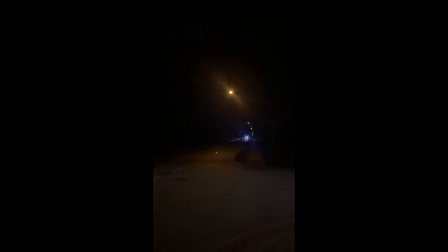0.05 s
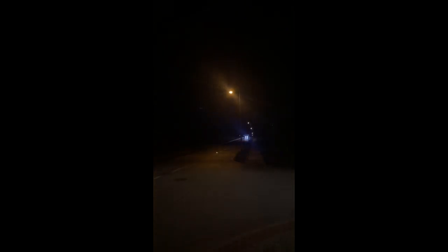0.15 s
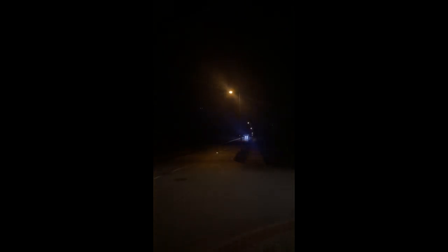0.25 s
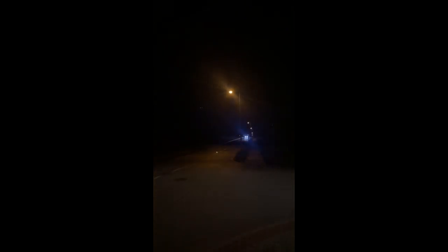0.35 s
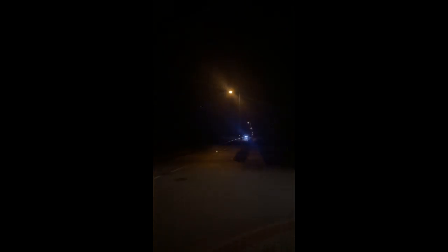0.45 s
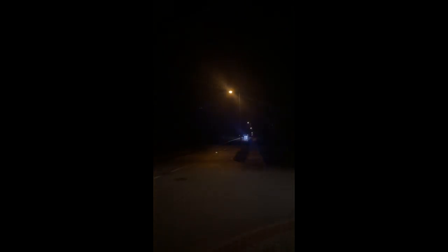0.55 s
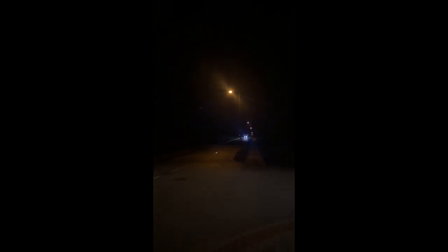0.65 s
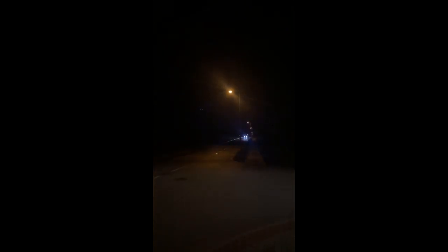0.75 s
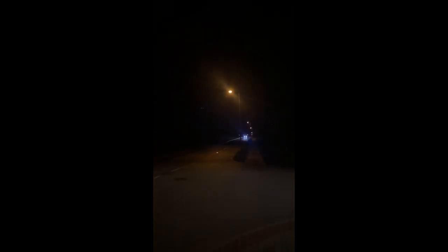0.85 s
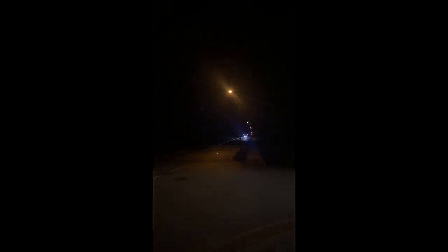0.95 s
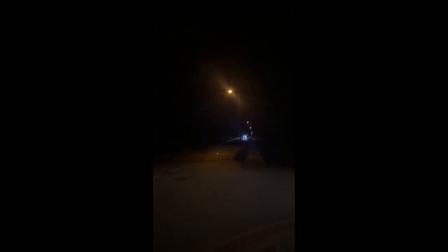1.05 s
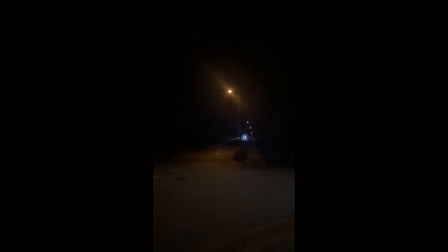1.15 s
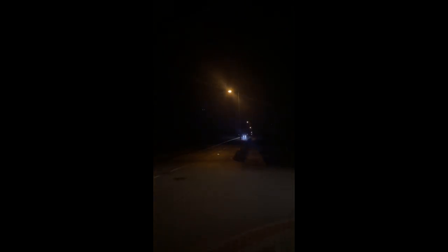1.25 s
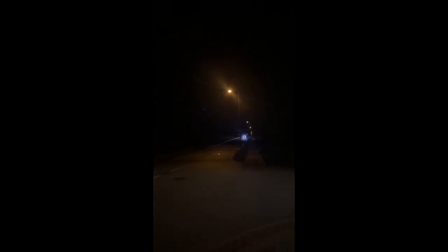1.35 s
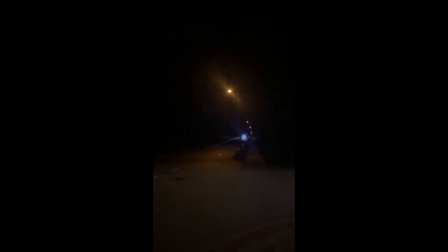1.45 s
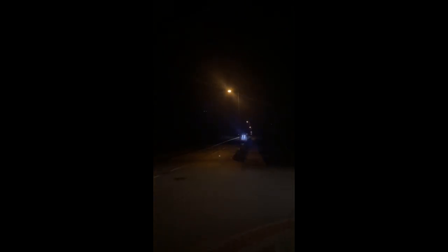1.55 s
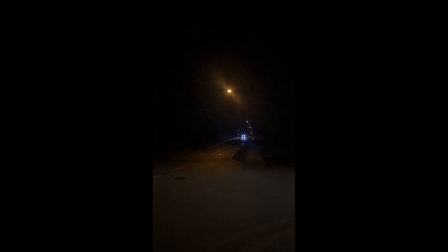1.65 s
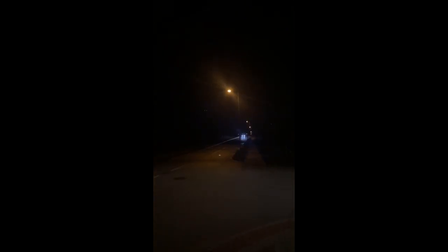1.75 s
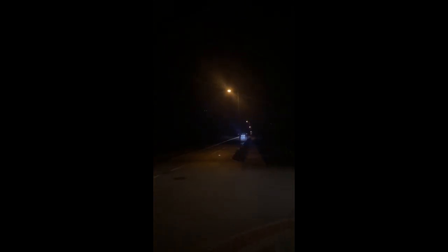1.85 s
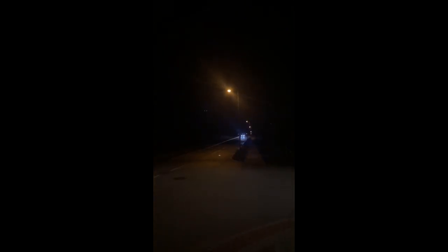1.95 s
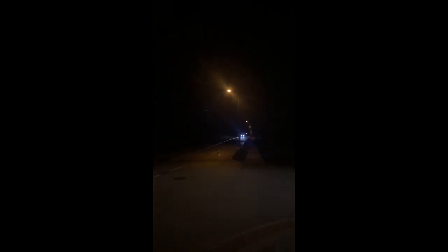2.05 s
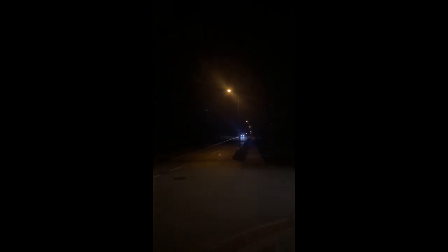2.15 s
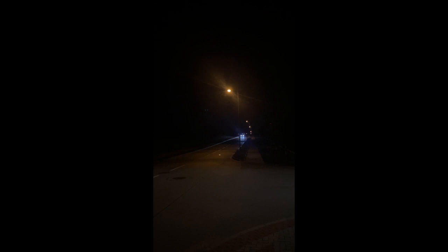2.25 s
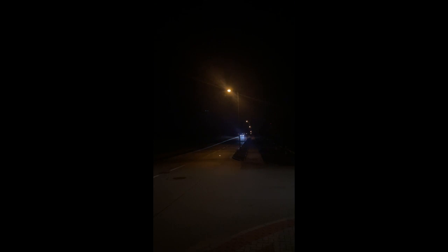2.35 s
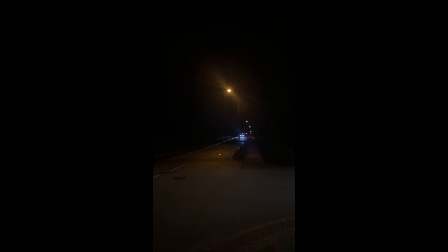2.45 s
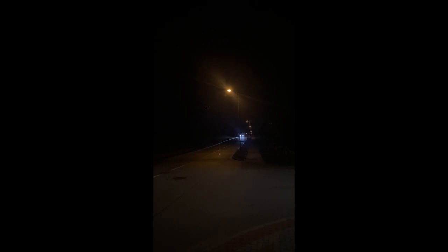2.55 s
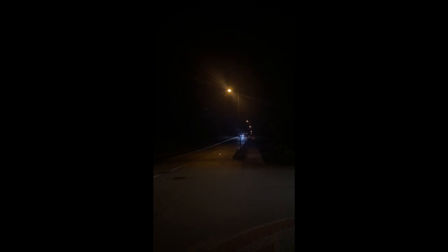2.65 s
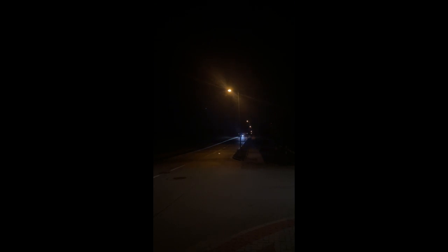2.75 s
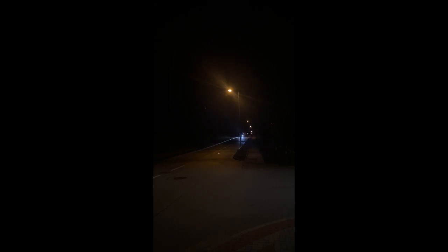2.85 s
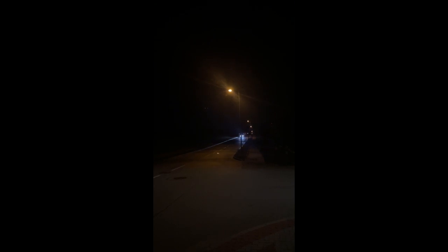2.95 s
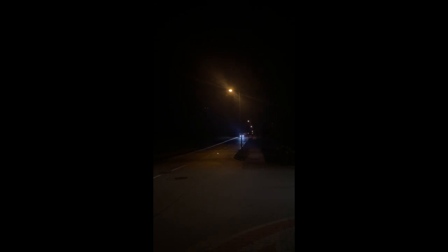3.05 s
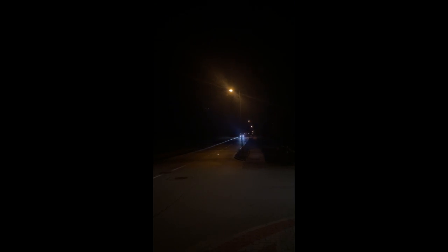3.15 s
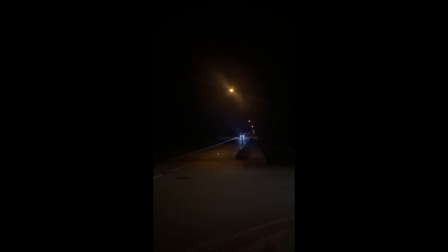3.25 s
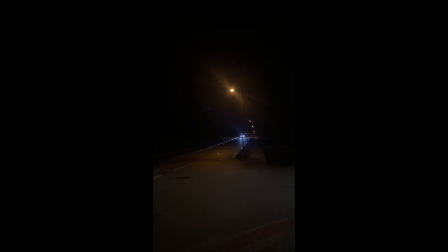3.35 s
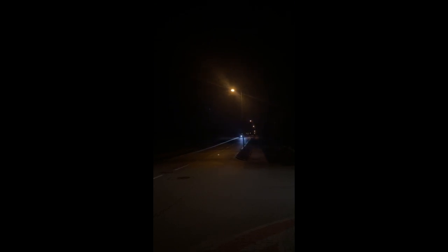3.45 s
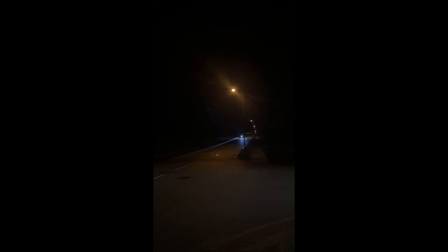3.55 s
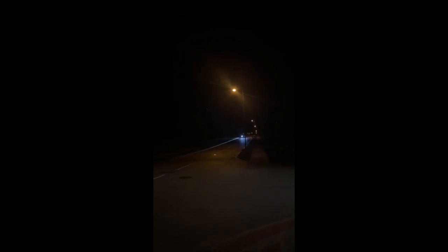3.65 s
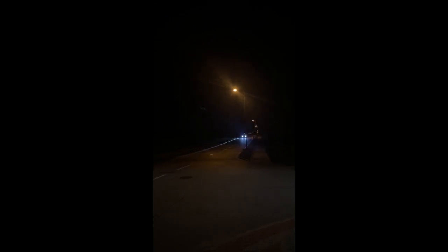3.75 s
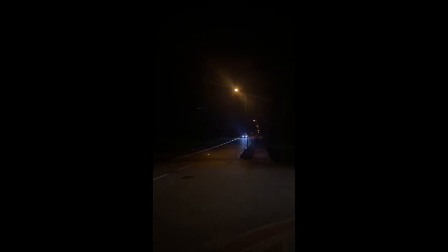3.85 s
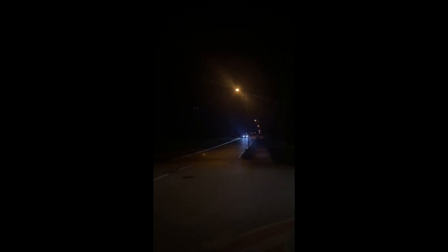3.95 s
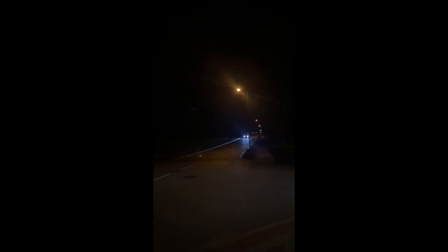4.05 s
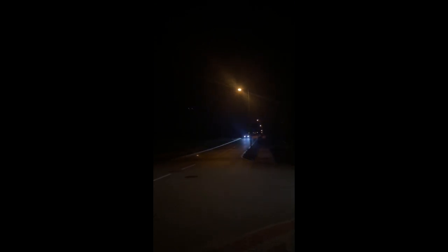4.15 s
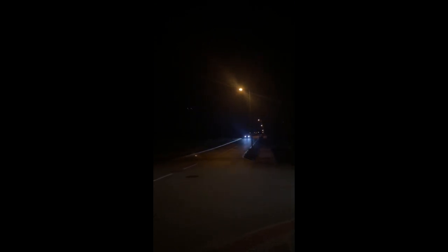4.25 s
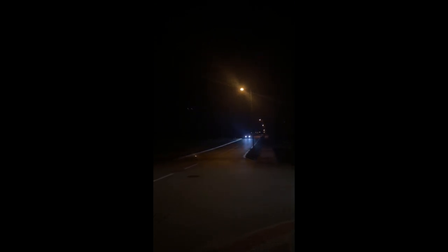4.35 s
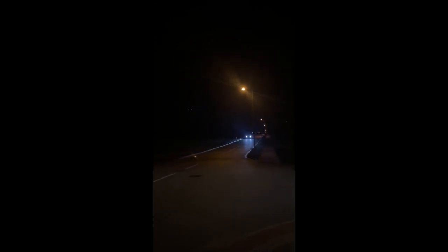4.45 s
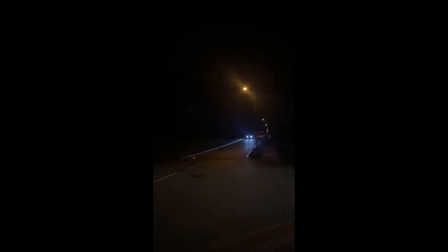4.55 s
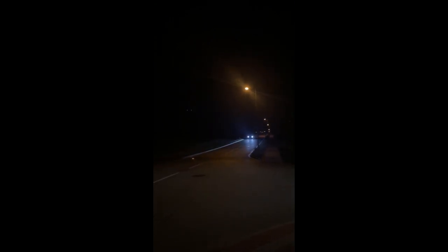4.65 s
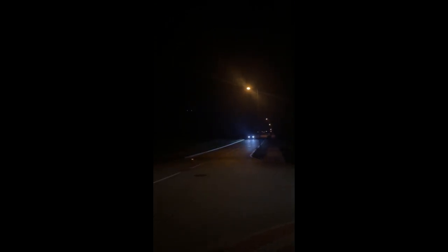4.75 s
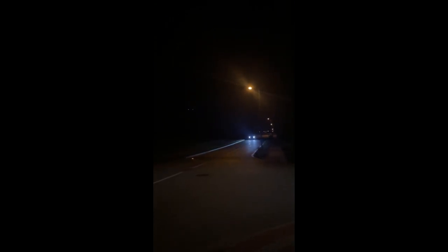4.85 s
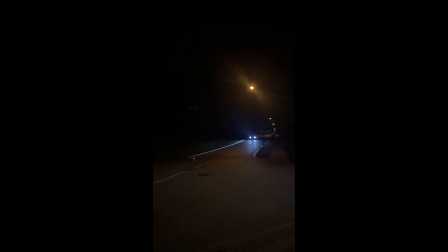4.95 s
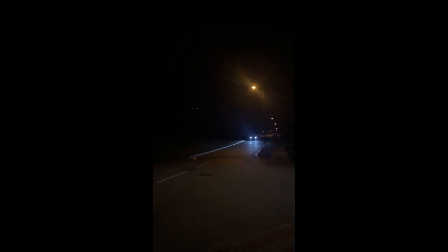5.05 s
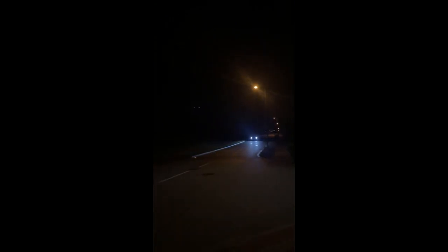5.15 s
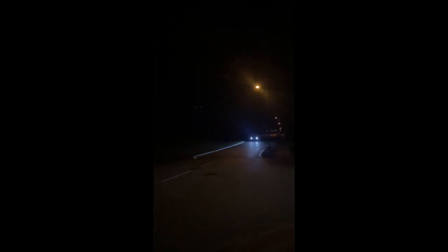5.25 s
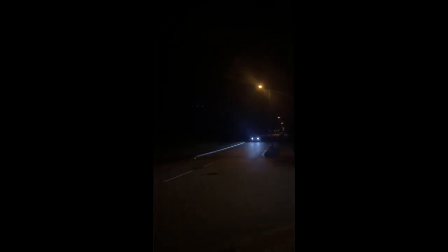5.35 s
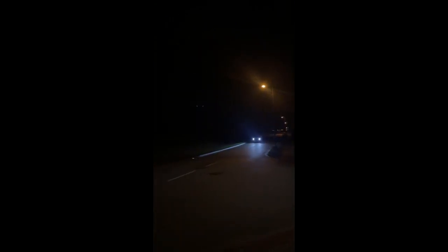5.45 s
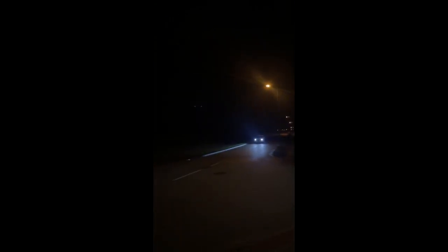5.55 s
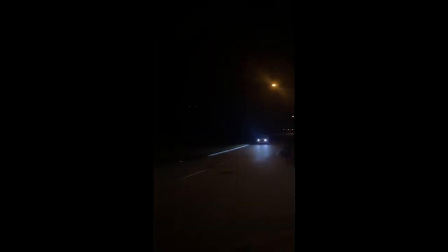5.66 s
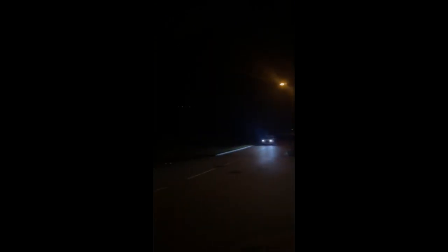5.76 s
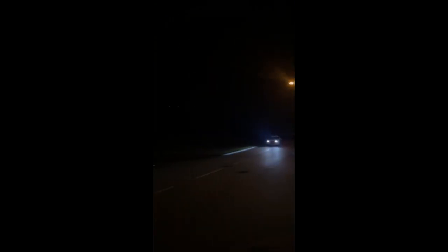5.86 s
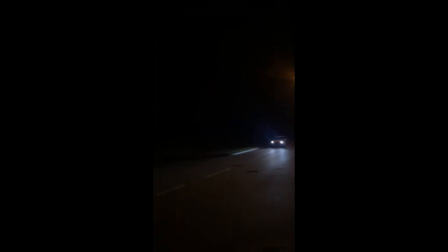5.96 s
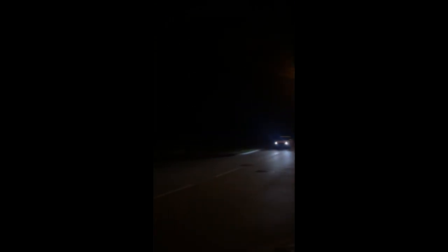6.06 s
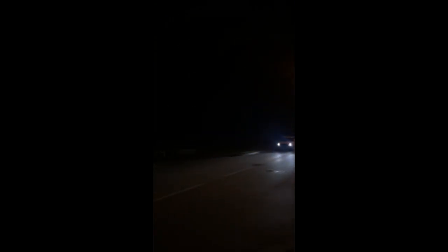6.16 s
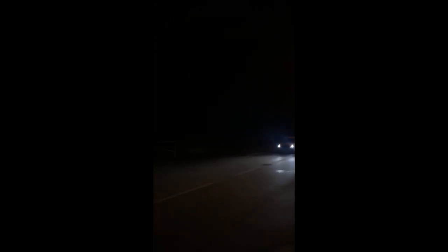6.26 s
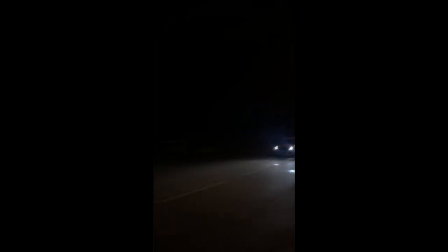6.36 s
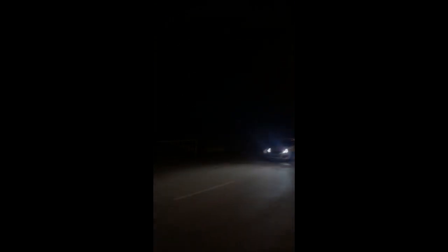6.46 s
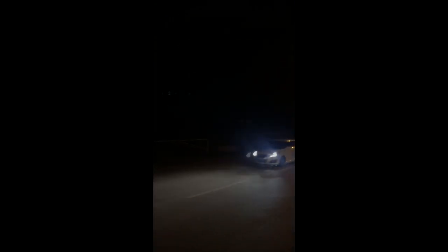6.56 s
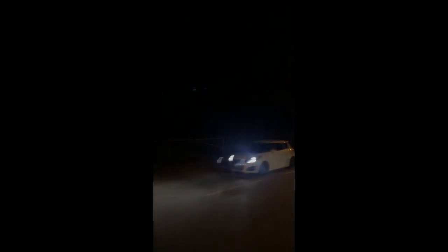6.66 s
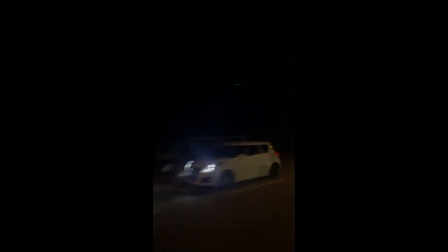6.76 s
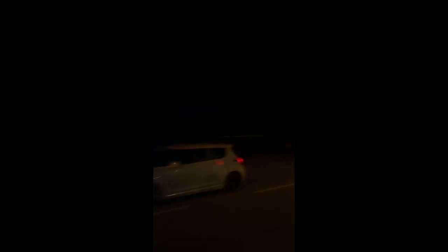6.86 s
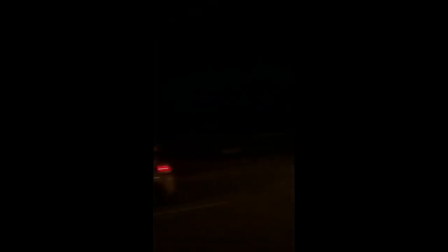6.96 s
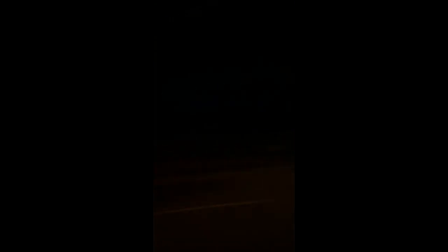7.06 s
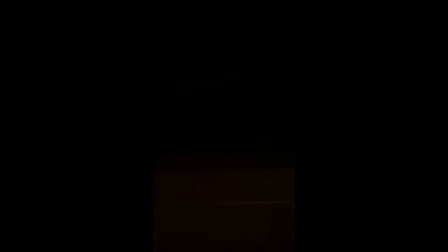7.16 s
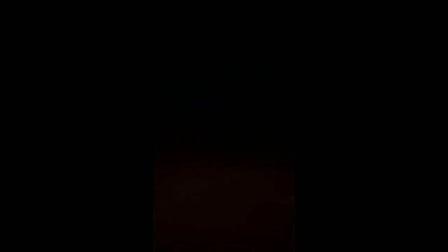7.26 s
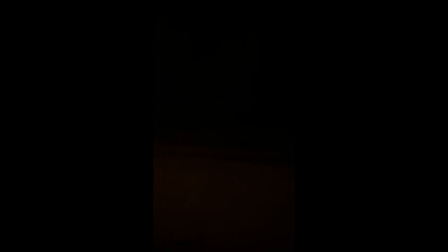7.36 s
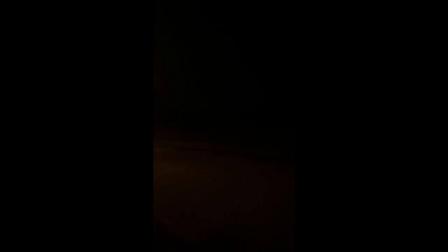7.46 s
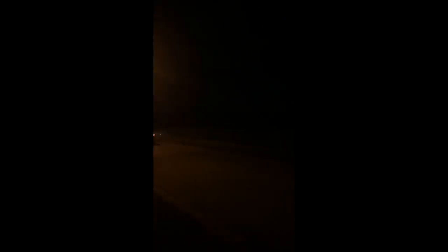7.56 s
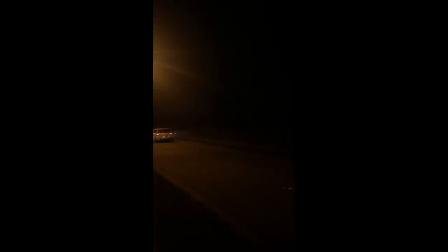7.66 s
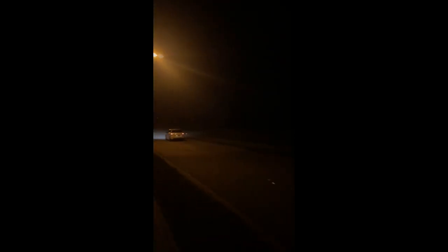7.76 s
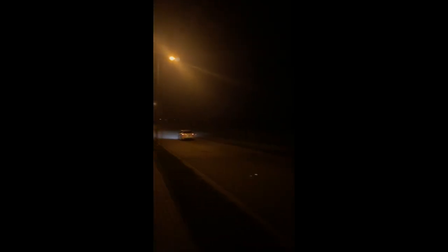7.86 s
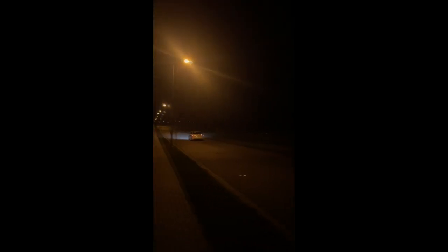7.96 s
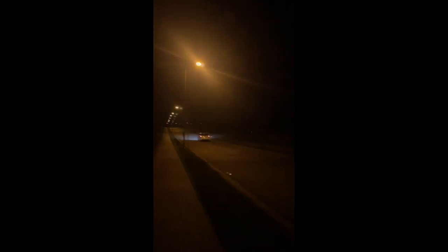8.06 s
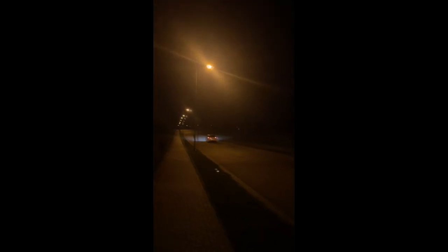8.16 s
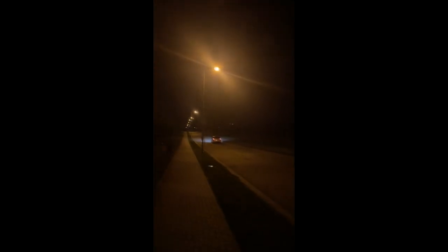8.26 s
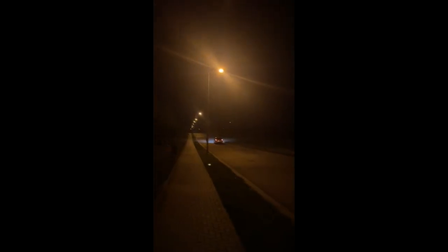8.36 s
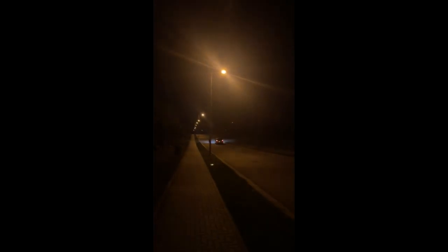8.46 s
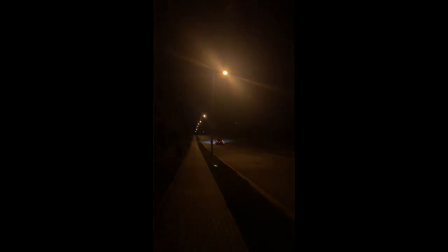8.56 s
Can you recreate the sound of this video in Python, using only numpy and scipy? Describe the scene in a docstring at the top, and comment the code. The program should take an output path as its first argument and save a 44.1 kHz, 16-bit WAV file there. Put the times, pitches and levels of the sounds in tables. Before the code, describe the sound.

Over a faint hum and the dull rumble of a town, a sporty car revs up the street toward a phone microphone. The raspy exhaust rises in pitch, dips at a gear change about halfway, then climbs more slowly as tyre noise swells. The car rushes by at close range, its note dropping, and fades away, with a soft low thump as the throttle closes.

```python
"""A loud car passes at night

A small four-cylinder car with a loud exhaust speeds up a street, shifts gear, passes close to a phone
and lifts off the throttle. Its firing cylinders make strong tones with weaker ones in between, which
ride on the roar of gas and tyres. Behind it are a low drone and the rumble of the town.
The phone's two microphones hear it all a little apart."""
import sys
import numpy as np
from scipy import signal
from scipy.io import wavfile
from scipy.ndimage import uniform_filter1d

SR = 44100
rng = np.random.default_rng(int(sys.argv[2]) if len(sys.argv) > 2 else 0)


def put_to_file(sound):
    """Save the sound as 16-bit audio at rate SR, in the file named by the first command-line argument."""
    columns = np.atleast_2d(sound).T  # one column per channel
    safe = np.clip(columns, -1, 1)
    whole_steps = np.round(safe * 32767)
    wavfile.write(sys.argv[1], SR, whole_steps.astype(np.int16))


N = 379701
HOP = 256  # samples from one frame of the spectrum to the next
LIFT_S = 8.325  # the throttle closes

# Firing rate as heard (pull, gear change, pull, drop on passing, lift-off): time_s, pitch_hz
FIRING_RATE = [(0, 129.1), (0.6, 145.8), (1.4, 170.6), (2.4, 203.5), (3.6, 240.1), (3.68, 241),
               (3.84, 227.8), (3.96, 236.8), (4.04, 216.6), (4.17, 182.9), (4.3, 188.7), (5.3, 208.2),
               (6.3, 224.9), (6.55, 227.4), (6.77, 226.4), (6.87, 219.6), (6.95, 210.7), (7.15, 200.6),
               (7.45, 199.3), (8.27, 204), (8.49, 193.1), (8.61, 198.4)]
# The roar's rise and fall, and boosts to its parts: time_s, level_db, bass_db, bark_db, treble_db
ROAR_LEVELS = [(0, -49.5, 3, 9, -4), (0.7, -46.5, -3.5, 8, -0.5), (1.1, -43, -2.5, 3.5, 1),
               (1.75, -37.5, -6, 5, -2), (2.1, -38, -9.5, -1, 0), (2.45, -35.5, -9, -1.5, -1),
               (3.0, -33, -2.5, -3, -6.5), (3.3, -33, -6, -0.5, -4.5), (3.62, -34, -0.5, -1, -2),
               (3.75, -39, 5, -0.5, -0.5), (4.2, -38, 2.5, 4.5, -3), (4.65, -39, 8.5, 2.5, 5.5),
               (5.15, -37, 9, -3, 5), (5.4, -34, 6, -1, 3.5), (5.65, -32, 8.5, -0.5, 2),
               (5.9, -27.5, 2.5, -9, -1.5), (6.05, -26, 3.5, -4, 3), (6.2, -22, -1, -6.5, 0),
               (6.4, -19.5, -2, -8, 1.5), (6.6, -19.5, -3, -2, 4), (6.9, -22.5, 2, -2.5, 3),
               (7.05, -24.5, 0.5, 2, 3.5), (7.3, -28.5, 2, 1.5, 1.5), (7.7, -30.5, -5.5, -2, -5.5),
               (8.15, -34, 0, -9, -4.5), (8.61, -37, 7, -6.5, 0)]
# Tones that stand out: multiple of the firing rate
STRONG_TONES = (1, 2, 3, 4, 5, 1.75, 2.5, 3.5, 3.75, 4.5)


def exhaust(firing):
    """Firing cylinders make tones; pipe and street favour some pitches over others."""
    # What gets through in four stages of the drive: pitch_hz, gain_db
    first_pull = [(130, 0), (170, 6), (195, 2), (212, -5), (225, -20.5), (240, -7), (265, -8.5),
                  (285, -10.5), (305, -20.5), (330, -15.5), (380, -30), (420, -12.5), (445, -8.5),
                  (468, -13), (510, -13), (540, -16), (570, -7.5), (615, -15.5), (670, -1.5), (720, -5),
                  (780, -9), (840, -12.5), (900, -20), (1120, -8), (1200, -20)]
    second_pull = [(185, 6), (200, 7), (215, 2.5), (224, -6.5), (228, -1), (340, -19), (385, -14.5),
                   (405, -9), (425, 3), (445, -9.5), (570, -9), (600, -10), (640, -20), (680, -8),
                   (715, -19), (760, 1.5), (800, -4), (850, -2), (900, -17.5), (1000, -18), (1150, -8)]
    pipe_facing_us = [(200, 0.5), (350, -2.5), (400, 8), (450, 2.5), (600, -7.5), (680, -17), (800, -6.5),
                      (900, -21), (1000, -9.5)]
    throttle_closed = [(200, 9.5), (350, 4), (400, 10.5), (600, -30), (800, -27)]
    # Each tone's strength as the car comes, then as it leaves: gain_db
    coming = (0.5, 0, 1, -2.5, -5, -4, -12, -8, -9.5, -12.5)
    leaving = (0, 0, 0.5, -5.5, -2.5, -12.5, -16, -7, -19, -8)
    # Single tones dip or swell briefly: time_s, multiple, gain_db, half_width_s
    swells = [(0.25, 5, 5.5, 0.26), (0.85, 3, -10, 0.053), (1.7, 4, 2.5, 0.19), (2.45, 4, -6, 0.13),
              (3.4, 1.75, 10, 0.49), (3.2, 2, -5, 0.29), (3.0, 3, 2.5, 0.62), (3.96, 3, 2, 0.055),
              (4.091, 3, -11, .03), (4.0, 1, -5, 0.034), (4.2, 3, -6, 0.037), (6.64, 2, 2, 0.033),
              (6.75, 3, -5, .08), (6.85, 2, 2.5, 0.027), (7.05, 2, 2.5, .05), (0.3, 2, 4.5, 0.35),
              (0.3, 4.5, 9, .3), (6.0, 3.5, 4.5, 0.21), (6.3, 3.75, -9, .3), (6.9, 3, 1, 0.046),
              (7.15, 3, 8, 0.33), (7.5, 2, 3.5, 0.18), (3.71, 1, -10, 0.027), (3.78, 1, 12.5, .05),
              (3.86, 1, 12.5, 0.048), (3.95, 2, 9, .08), (3.75, 3, -4.5, 0.044), (4.12, 4, 1, 0.035),
              (6.62, 1, 5, 0.066), (6.735, 1, -24, 0.018), (6.83, 1, 3, 0.037), (6.89, 1, -6, 0.033),
              (7.01, 1, 2, 0.042), (6.74, 2, 6.5, 0.039), (6.81, 2, -3, .02), (6.93, 2, -9, 0.043),
              (6.61, 3, 10, 0.026), (7.45, 3, -3.5, 0.095), (8.0, 2, -7.5, 0.34), (8.33, 2, -16, 0.012),
              (8.45, 2, 3, 0.06), (8.55, 1, -6, 0.041), (8.58, 2, -7, 0.054)]
    shift, turn, lift = (4.07, .036), (6.62, .06), (LIFT_S, .022)  # time_s, fade_s
    stages = ((second_pull, shift), (pipe_facing_us, turn), (throttle_closed, lift))
    t = np.arange(0, N, HOP) / SR
    hz = np.interp(t, *np.transpose(FIRING_RATE))
    roar_db = np.interp(t, *np.transpose(ROAR_LEVELS)[:2])
    levels = []
    for k, coming_db, leaving_db in zip(STRONG_TONES, coming, leaving):
        tone_db = coming_db + step(t, *turn) * (leaving_db - coming_db)
        pipe_db = at_pitch(first_pull, k * hz)
        for response, change in stages:
            pipe_db += step(t, *change) * (at_pitch(response, k * hz) - pipe_db)
        swell_db = sum(bump(t, at, db, width) for at, multiple, db, width in swells if multiple == k)
        levels.append(roar_db + tone_db + pipe_db + swell_db)
    return tones(firing, STRONG_TONES, t, levels)


def weak_tones(firing, count=48):
    """Tones at the remaining quarters of the firing rate fade in and out as street echoes shift."""
    # The cylinders differ: gain_db for whole, quarter, half and three-quarter multiples
    uneven = (3, 0.5, -3, -4.5)
    waver_db = 2.8 * wander(4, (count + 1, N // HOP + 2))
    start = 2 * np.pi * rng.random(count + 1)
    frame_starts = HOP * np.arange(waver_db.shape[1])
    out = np.zeros(N)
    for k in range(1, count + 1):
        if k / 4 not in STRONG_TONES:
            gain = np.interp(np.arange(N), frame_starts, undb(waver_db[k] + uneven[k % 4]))
            out += gain * np.sin(k / 4 * firing + start[k])
    return undb(-24) * out


def roar(firing):
    """Gas and tyre noise puffs with each firing and shares one changing colour with the weak tones."""
    # Brief surges: time_s, gain_db, half_width_s
    surges = [(3.97, 4, 0.13), (6.649, 3.5, 0.033), (6.75, 3.5, 0.031), (8.31, 3.5, 0.061)]
    pass_s, speed_m_s, close_m, distant_m = 6.97, 21.6, 16.3, 67
    hz, t, noise = spectrum(rng.standard_normal(N) * (1 + .1 * np.cos(firing)))
    level_db = np.interp(t, *np.transpose(ROAR_LEVELS)[:2])
    level_db += sum(bump(t, *surge) for surge in surges)
    position_m = speed_m_s * (t - pass_s)
    near = np.clip((distant_m - abs(position_m)) / (distant_m - close_m), 0, 1)
    # Weak tones grow with the revs, dip alongside us, and from afar carry best near 1700 Hz.
    revs_db = .0579 * (np.interp(t, *np.transpose(FIRING_RATE)) - 202.5)
    alongside_db = bump(position_m, at=2.6, db=-5, width=5.2)
    carry_db = np.outer(bump(hz, at=1700, db=3, width=600), 1 - near)
    weak = spectrum(weak_tones(firing))[2] * undb(revs_db + alongside_db + carry_db - 3.5)
    colour_db = roar_colour(hz, t, near) + street_colour(hz, t, near)
    return to_samples((noise + weak) * undb(colour_db + level_db + 14.5))


def roar_colour(hz, t, near):
    """The roar's mix of low and high, in dB, changes as the car comes near."""
    # The roar down the street, then close by: pitch_hz, gain_db
    far_colour = [(40, -11), (150, -1), (480, -12), (680, -6.5), (880, -8.5), (1200, -5), (1480, -7.5),
                  (1800, -3.5), (2250, -9.5), (2550, -11.5), (3300, -26), (3850, -25.5), (5300, -32.5),
                  (8000, -35.5), (15500, -72)]
    near_colour = [(40, -13), (75, 2), (130, -2), (300, -2.5), (520, -6), (900, -1), (1500, -4),
                   (2700, -10.5), (3500, -19), (5300, -21.5), (8000, -26.5), (11000, -33.5), (15500, -47.5)]
    # One band swells for a while: time_s, half_width_s, pitch_hz, half_width_hz, gain_db
    rasps = [(0.3, 0.46, 1740, 199, 1), (3.5, .3, 1870, 250, 3.5), (4.4, 0.35, 1370, 200, 7),
             (5.55, 0.38, 950.3, 150.4, 5), (7.93, 0.063, 2000, 400, 5.5), (8.4, 0.32, 1040, 300, 0.5)]
    # A thin hiss climbs as the car nears: time_s, pitch_hz, gain_db
    hiss = [(5.6, 3950, 0), (5.9, 4080, 7), (6.3, 4280, 8), (6.55, 4400, 7), (6.65, 4400, 0)]
    times, _, *boosts = np.transpose(ROAR_LEVELS)
    bass_db, bark_db, treble_db = (np.interp(t, times, boost) for boost in boosts)
    colour = np.outer(at_pitch(far_colour, hz), 1 - near) + np.outer(at_pitch(near_colour, hz), near)
    colour += np.outer(1 / (1 + (hz / 350) ** 2), bass_db) + np.outer(hz / 8000, treble_db)
    colour += bump(hz[:, None], at=680, db=bark_db, width=220)  # the bark of the gas
    for at, width_s, pitch_hz, width_hz, db in rasps:
        colour += np.outer(bump(hz, pitch_hz, .87, width_hz), bump(t, at, db, width_s))
    times, hiss_hz, hiss_db = np.transpose(hiss)
    return colour + bump(hz[:, None], np.interp(t, times, hiss_hz), np.interp(t, times, hiss_db), 100)


def pipe_thump(pitch_hz=75, peak_db=-29, ring_s=.14):
    """The pipe gives one soft, low ring as the throttle closes."""
    age = np.maximum(np.arange(N) / SR - LIFT_S, 0)
    return undb(peak_db - 60 * age / ring_s) * np.sin(2 * np.pi * pitch_hz * age)


def street_colour(hz, t, near):
    """The street and its many small echoes put peaks and dips, in dB, into the roar."""
    # A hollow colour that fades as the car nears: pitch_hz, half_width_hz, gain_db
    hollow = [(825, 83, -3), (1740, 52, 3.5), (2310, 70, -5), (2500, 100, 3), (3410, 150, -0.5),
              (3920, 150, 3.5), (4700, 82, 4.5), (5190, 220, 4)]
    hollow_db = np.outer(sum(bump(hz, at, db, width) for at, width, db in hollow), 1 - near)
    bands = wander(7, (32, len(t)))  # neighbouring pitches swell and sink together
    band_index = np.interp(np.log(hz + 1), np.log([60, 16000]), [0, 31]).round().astype(int)
    echo_ripple = uniform_filter1d(wander(1.2, hollow_db.shape), size=2, axis=0)
    return hollow_db + .8 * bands[band_index] + 1.7 * echo_ripple / echo_ripple.std()


def drone():
    """A low hum and its octave, perhaps another engine further off."""
    # The hum's path: time_s, pitch_hz, level_db, octave_level_db
    hum = [(0, 57.1, -47.5, -54), (1.0, 60.5, -50, -51), (1.3, 62.36, -49, -60), (2, 65.3, -44, -50.5),
           (2.73, 68.7, -43, -50), (3.4, 70.3, -48.5, -51), (3.85, 71.4, -47.5, -60), (4.1, 61, -53, -76),
           (4.6, 63.5, -53, -56), (5.3, 66.2, -57, -48), (5.8, 67, -57, -51), (6.2, 69, -70, -70)]
    times, hz, *levels = np.transpose(hum)
    return tones(running_phase(times, hz), (1, 2), times, levels)


def town(level_db=-50.5):
    """Far traffic makes a dull rumble that swells slowly."""
    # The rumble's colour: pitch_hz, gain_db
    colour = [(30, -7.5), (60, -1.5), (120, -4.5), (300, -32), (650, -20), (1700, -23), (4000, -43),
              (9000, -73.5)]
    hz, t, noise = spectrum(rng.standard_normal(N))
    swell_db = 2.1 * wander(.57, (1, len(t)))
    rumble = to_samples(noise * undb(at_pitch(colour, hz)[:, None] + swell_db))
    return undb(level_db) * rumble / rumble.std()


def microphones(x):
    """Two microphones hear slightly different timing and level, and each its own scattered sound."""
    # How far the left one is ahead: pitch_hz, lead_radians
    left_lead = [(0, 0), (950, .5), (1550, .3), (3790, 1.3), (4310, 1.4), (5000, .1), (7060, 2.9),
                 (8180, 3.4), (10300, 6.1), (11600, 6.4), (13500, 9.3), (15500, 10)]
    # How much louder the left one is: pitch_hz, gain_db
    left_louder = [(60, -.5), (200, -2), (380, -3.5), (700, -2.2), (1290, .8), (2380, 0), (5000, -1),
                   (9000, 0)]
    # Strength of the scattered sound: pitch_hz, gain_db
    scatter = [(60, -24), (300, -16), (1400, -11.5), (3100, -6), (5000, -2), (7500, -16), (11000, -4),
               (15000, -2)]
    hz, _, spec = spectrum(x)
    side = np.array([.5, -.5])[:, None, None]
    lead = np.interp(hz, *np.transpose(left_lead))[:, None]
    direct = undb(side * at_pitch(left_louder, hz)[:, None]) * np.exp(1j * side * lead)
    drift = uniform_filter1d(rng.standard_normal((2, 2) + spec.shape), size=5, axis=3) * np.sqrt(5 / 2)
    scattered = undb(at_pitch(scatter, hz))[:, None] * (drift[0] + 1j * drift[1])
    return to_samples(spec * (direct + scattered))


def tones(phase, multiples, times, levels):
    """Sine waves that flutter, more so when higher and once the throttle closes."""
    starts = 2 * np.pi * rng.random(len(levels))
    flutters = wander(30, (len(levels), N // HOP + 2))
    t = np.arange(N) / SR
    out = np.zeros(N)
    for k, db, start, flutter in zip(multiples, levels, starts, flutters):
        depth = .045 * k + .15 * (t > LIFT_S)
        wobble = depth * np.interp(t, np.arange(len(flutter)) * HOP / SR, flutter)
        gain = np.sqrt(2) * undb(np.interp(t, times, db))
        out += gain * (1 + wobble) * np.sin(k * phase + start + wobble)
    return out


def running_phase(times, hz):
    """Adds up a pitch curve into an angle in radians."""
    return 2 * np.pi * np.cumsum(np.interp(np.arange(N) / SR, times, hz)) / SR


def undb(db):
    """Turns decibels into a gain."""
    return 10 ** (np.asarray(db) / 20)


def at_pitch(table, hz):
    """Reads a (pitch_hz, value) table with octaves evenly spaced."""
    at, value = np.transpose(table)
    return np.interp(np.log(hz + 1), np.log(at + 1), value)


def wander(rate_hz, shape):
    """Rows of smooth random drift, one value a frame, about 1 in size."""
    span = max(int(SR / HOP / rate_hz), 1)
    rows = uniform_filter1d(uniform_filter1d(rng.standard_normal(shape), span, axis=1), span, axis=1)
    return rows / rows.std()


def bump(x, at, db, width):
    """A bell-shaped rise or dip in dB."""
    return db * np.exp(-((x - at) / width) ** 2)


def step(t, at, fade):
    """A smooth change from 0 to 1."""
    return .5 + .5 * np.tanh((t - at) / fade)


def spectrum(x):
    """Splits sound into short frames: gives pitches, times and the spectrum."""
    return signal.stft(x, SR, nperseg=4 * HOP, noverlap=3 * HOP, boundary="even", padded=True)


def to_samples(spec):
    """Joins frames back into sound and fades the very end."""
    x = signal.istft(spec, SR, nperseg=4 * HOP, noverlap=3 * HOP)[1][..., :N]
    return x * np.minimum((N - np.arange(N)) / 64, 1)


def scene():
    """Car, drone and town as the two microphones hear them."""
    firing = running_phase(*np.transpose(FIRING_RATE))
    car = exhaust(firing) + roar(firing) + pipe_thump()
    return microphones(car + drone() + town())


def record(dry):
    """The phone drops the deepest bass, rounds the loudest peaks and cuts the highest treble."""
    bass_cut = signal.butter(3, 48, "high", fs=SR, output="sos")
    treble_cut = signal.ellip(12, .2, 90, 15750, fs=SR, output="sos")
    return signal.sosfilt(treble_cut, np.tanh(signal.sosfilt(bass_cut, dry)))


dry = scene()
out = record(dry)
put_to_file(out)
```